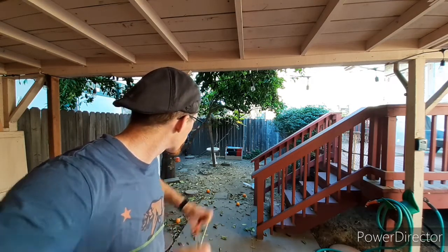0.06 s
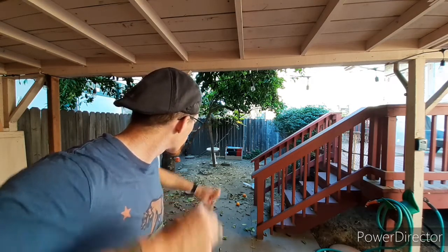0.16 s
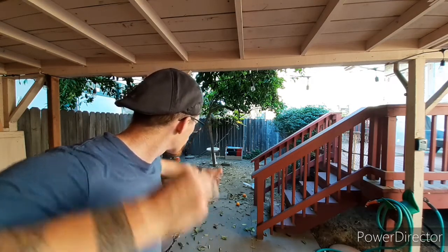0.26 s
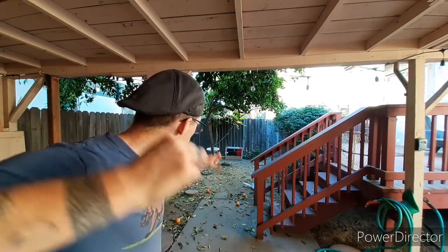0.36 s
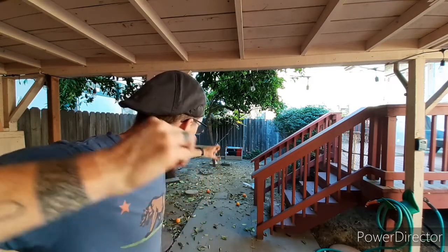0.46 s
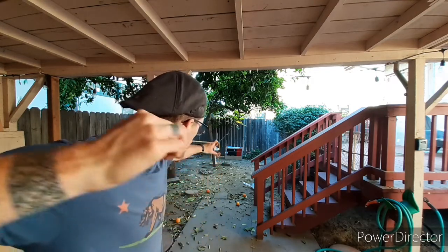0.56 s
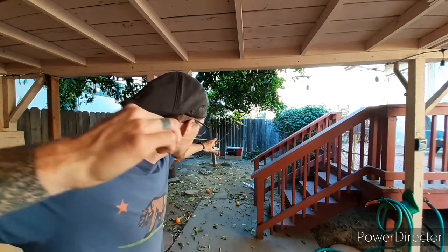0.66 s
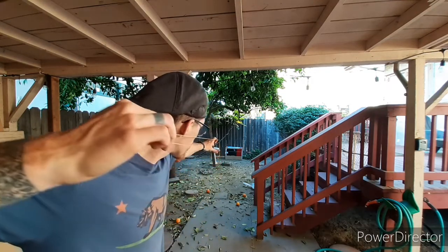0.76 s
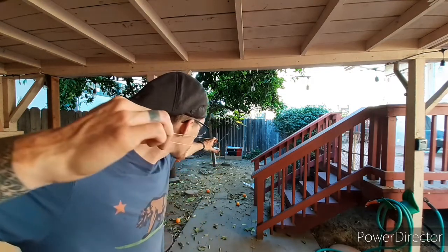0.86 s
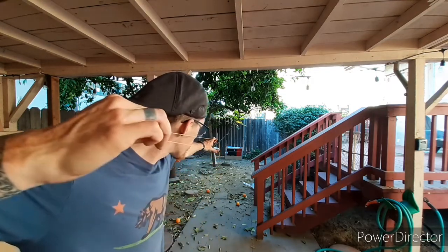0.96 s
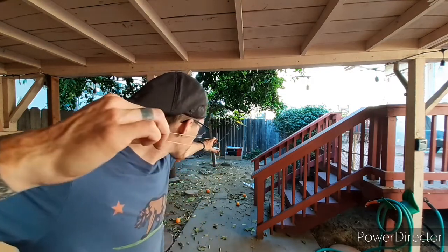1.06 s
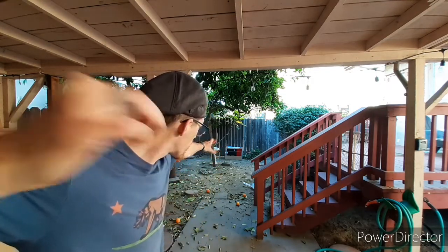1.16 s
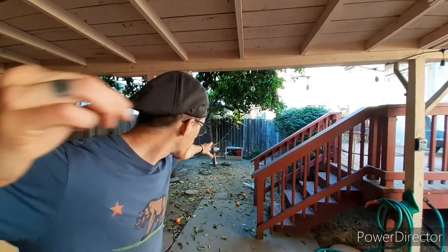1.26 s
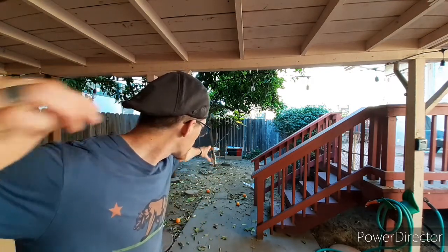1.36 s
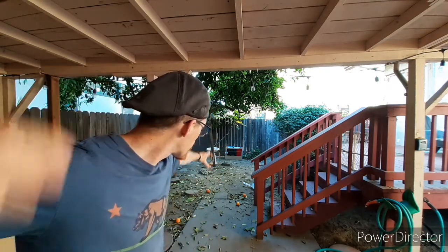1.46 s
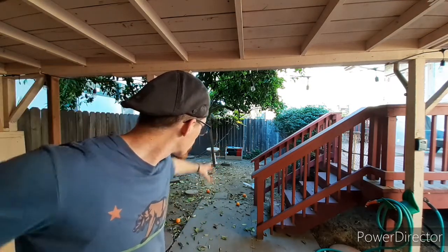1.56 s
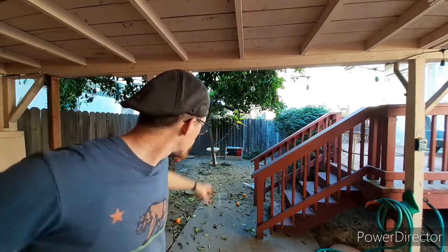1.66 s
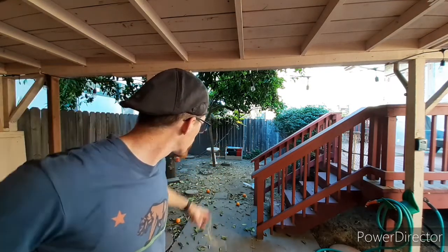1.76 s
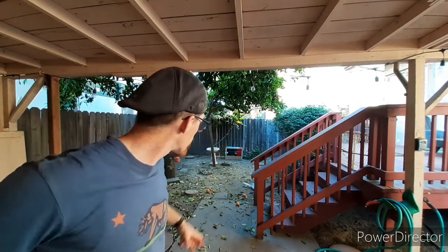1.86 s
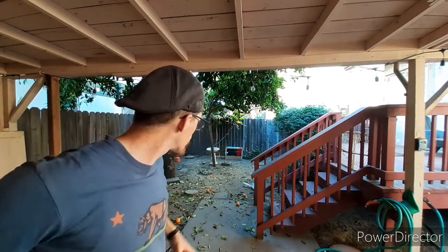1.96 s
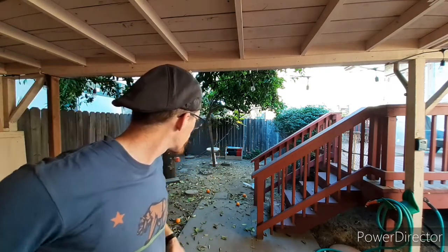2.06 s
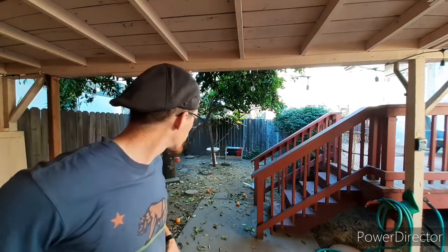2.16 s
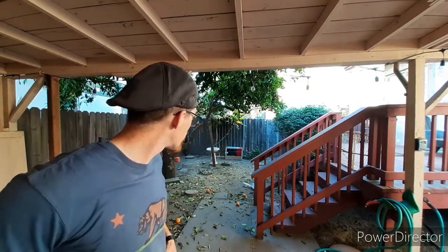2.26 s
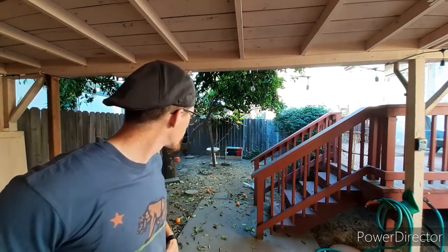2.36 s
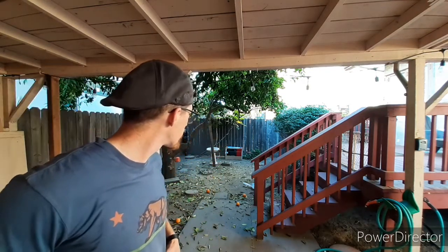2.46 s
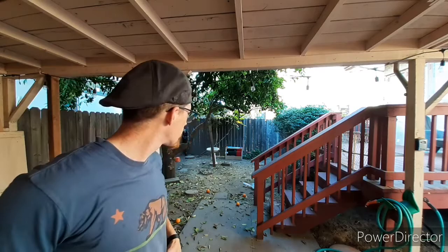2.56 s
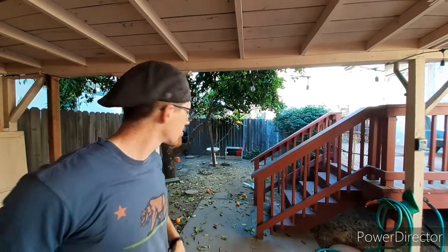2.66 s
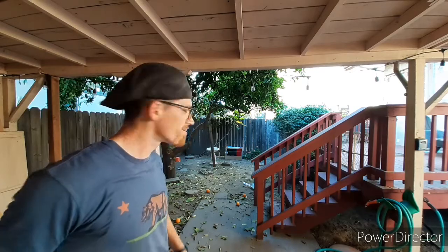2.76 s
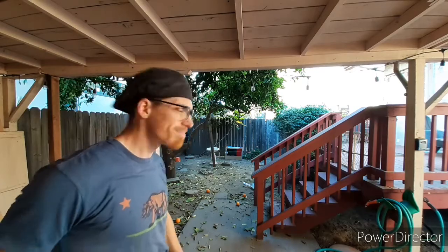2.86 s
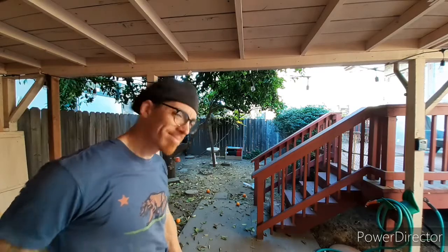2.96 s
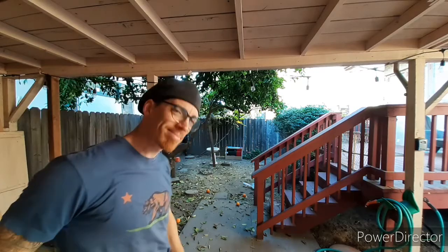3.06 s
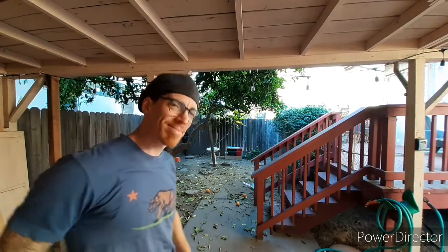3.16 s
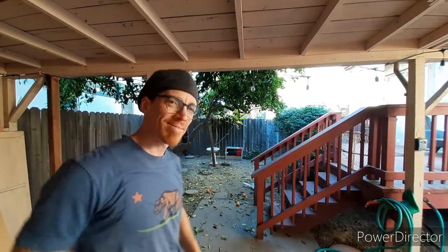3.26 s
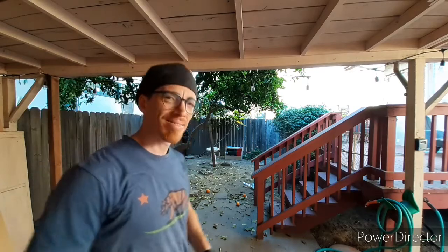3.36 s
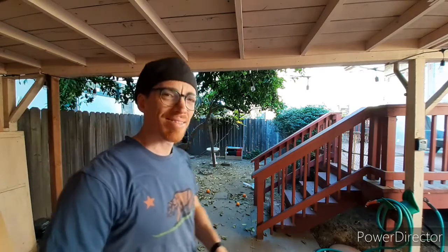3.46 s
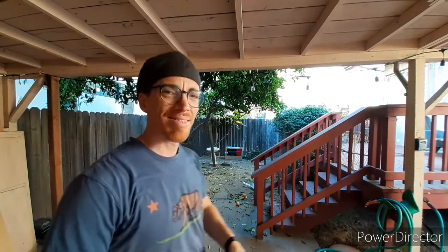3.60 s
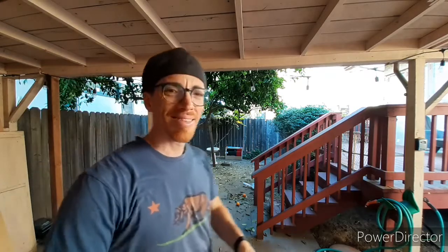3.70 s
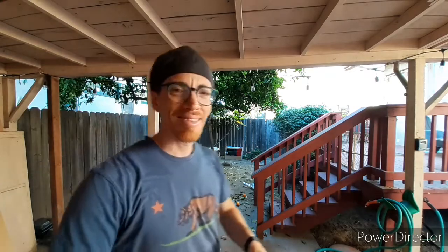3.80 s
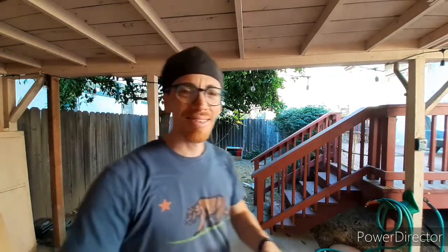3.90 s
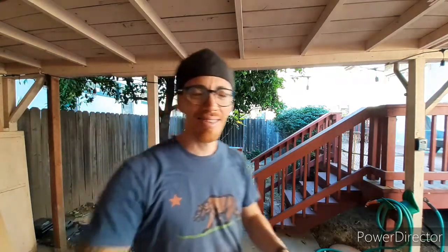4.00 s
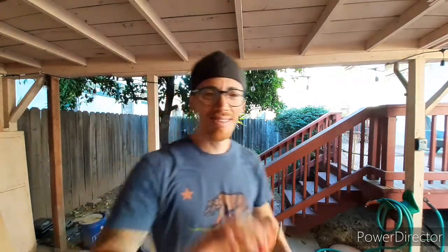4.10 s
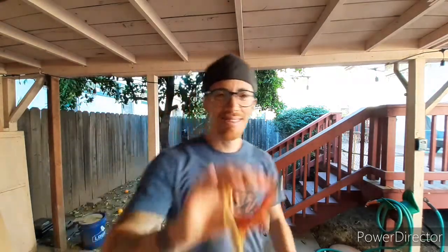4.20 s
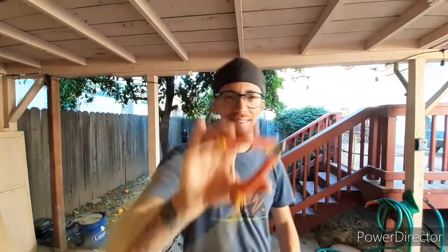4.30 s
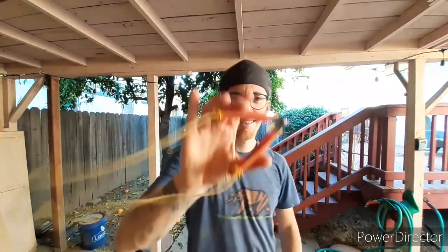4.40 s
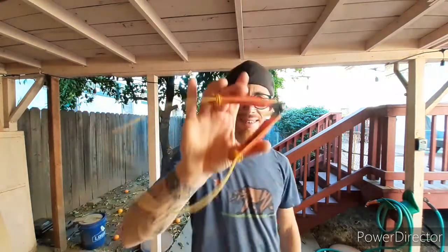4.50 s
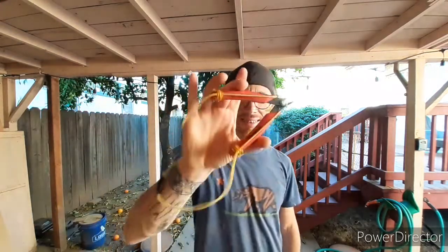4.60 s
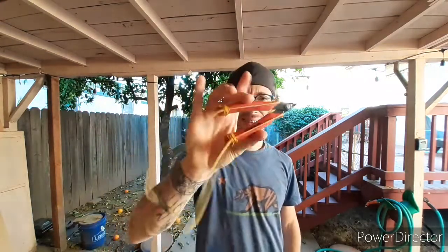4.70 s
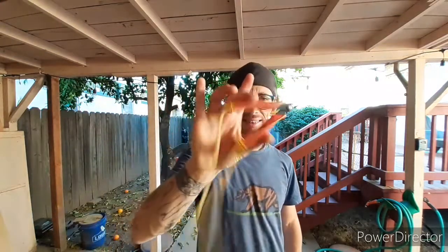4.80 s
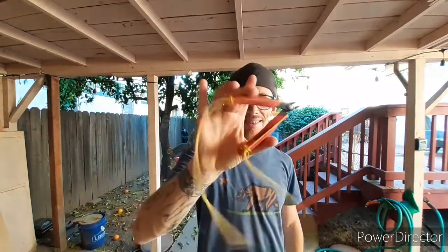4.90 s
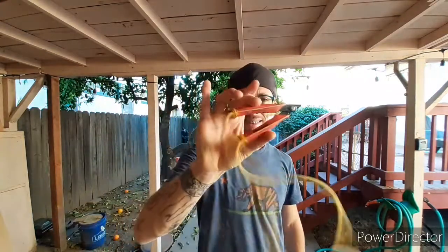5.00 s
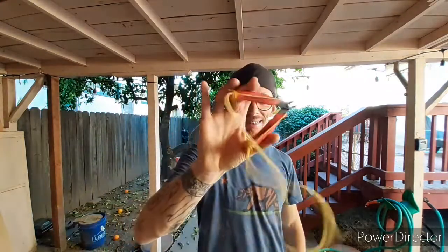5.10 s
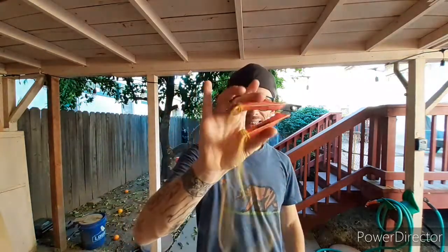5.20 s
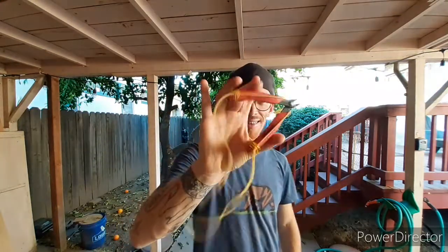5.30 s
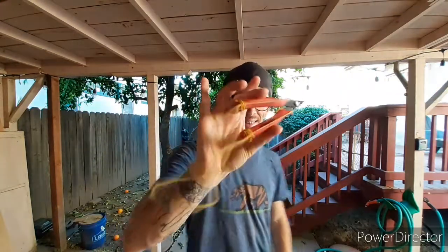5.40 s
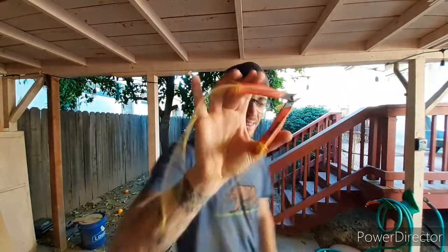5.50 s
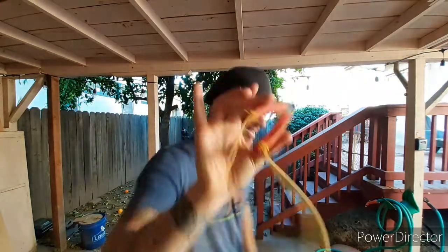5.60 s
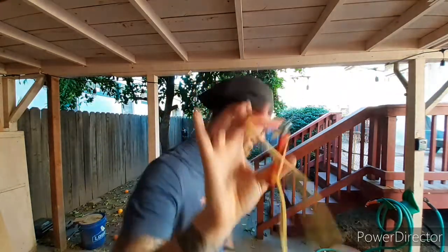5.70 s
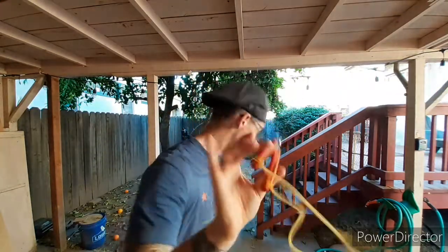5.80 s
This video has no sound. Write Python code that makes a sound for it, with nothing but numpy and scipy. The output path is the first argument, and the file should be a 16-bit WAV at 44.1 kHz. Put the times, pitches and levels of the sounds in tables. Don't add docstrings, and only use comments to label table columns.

```python
import sys
import numpy as np
from scipy import signal
from scipy.fft import rfft, irfft, next_fast_len
from scipy.io import wavfile
from scipy.ndimage import uniform_filter1d

SR = 44100
rng = np.random.default_rng(int(sys.argv[2]) if len(sys.argv) > 2 else 0)


def linear_from_db(decibels):
    return 10 ** (np.asarray(decibels, float) / 20)


def to_wav(sig):
    pcm = np.clip(np.atleast_2d(sig), -1, 1) * 32767
    pcm = np.round(pcm).astype(np.int16)
    wavfile.write(sys.argv[1], SR, pcm.T)


N = 257940


def evened(x):
    return x / np.sqrt(np.mean(x ** 2) + 1e-20)


def read(points, hz):
    f, value = np.transpose(points)
    return np.interp(np.log(hz + 1), np.log(f + 1), value)


def add(mix, s, sound):
    part = mix[..., round(s * SR):][..., :sound.shape[-1]]
    part += sound[..., :part.shape[-1]]


def colour(points, tilt_db=0.):
    hz = abs(np.fft.fftfreq(4096, 1 / SR))
    level_db = read(points, hz) + tilt_db * np.log2((hz + 50) / 3000)
    log_gain = np.log(linear_from_db(np.maximum(level_db, -100)))
    phase = -signal.hilbert(log_gain).imag
    taps = np.fft.ifft(np.exp(log_gain + 1j * phase)).real[:2048]
    return taps / np.linalg.norm(taps)


def resonate(x, hz, width_hz):
    turn = np.exp(2j * np.pi * np.cumsum(hz * np.ones(x.shape[-1])) / SR)
    r = np.exp(-np.pi * width_hz / SR)
    return 2 * (turn * signal.lfilter([1 - r], [1, -r], x / turn)).real


def wander(count, seconds):
    pole = np.exp(-1 / (seconds * SR))
    return evened(signal.lfilter([1], [1, -pole], rng.standard_normal(count)))


def drift(seconds):
    coarse = N // 64 + 2
    return np.interp(np.arange(N) / 64, np.arange(coarse), wander(coarse, seconds / 64))


def stroke(t, s, hold_s, rise_db_per_s, fall_db_per_s):
    return -rise_db_per_s * np.maximum(s - t, 0) - fall_db_per_s * np.maximum(t - s - hold_s, 0)


def hiss(field_db, likeness, size):
    frames, hz = N * 4 // size + 5, np.fft.rfftfreq(size, 1 / SR)[:, None]
    a, b, c, d = rng.standard_normal((frames, len(hz), 4)).T
    same, left = np.clip(likeness(hz), 0, 1), a + 1j * b
    right = same * left + np.sqrt(1 - same ** 2) * (c + 1j * d)
    z = np.array([left, right]) * linear_from_db(field_db(hz, np.arange(frames) * size / 4 / SR))
    return signal.istft(z, nperseg=size, noverlap=size - size // 4)[1][:, :N]


def burst(ms):
    t = np.arange(600) / SR
    a, b = rng.standard_normal((2, len(t)))
    return np.array([a, 0.45 * a + 0.42 * b]) * np.exp(-(t / (ms / 1000)) ** 2) * .5


def ring(modes, rise_s):
    t = np.arange(SR * 3 // 8) / SR
    detune = 1 + .01 * rng.standard_normal(len(modes))
    out = np.zeros(len(t))
    for (hz, db, t60_s), d in zip(modes, detune):
        out += linear_from_db(db - 60 * t / t60_s) * np.sin(2 * np.pi * hz * d * t)
    return out * (1 - np.exp(-t / rise_s))


# (frequency [Hz], t60 [s])
YARD_T60 = [(120, 0.63), (330, 0.56), (870, 0.49), (2300, 0.49), (6060, 0.43), (13000, 0.39)]
# (frequency [Hz], likeness [clipped to 0..1])
LIKENESS = [(60, 0.9), (250, 0.65), (550, 0.24), (1650, -2.4), (4970, -2.5), (15000, 0.4)]


def echoes(gap_s, rise_s, stretch):
    hz, t, z = signal.stft(rng.standard_normal((2, SR * 3 // 8)), SR, nperseg=256)
    same = np.clip(read(LIKENESS, hz), 0, 1)[:, None]
    z = np.array([z[0], same * z[0] + np.sqrt(1 - same ** 2) * z[1]])
    patches = uniform_filter1d(rng.standard_normal(z.shape[1:]), 3, axis=0)
    z = z * linear_from_db(1.3 * evened(uniform_filter1d(patches, 8, axis=1)))
    decay_db = -60 * t / (stretch * read(YARD_T60, hz)[:, None])
    tail = signal.istft(z * linear_from_db(decay_db), SR, nperseg=256)[1]
    count = tail.shape[1]
    onset = np.clip((np.arange(count) / SR - gap_s) / rise_s, 0, 1)
    tail = tail * onset * linear_from_db(0.87 * wander(count, 0.00083))
    return tail / np.linalg.norm(tail[0])


# (frequency [Hz], level [dB], t60 [s])
BOX_MODES = [(184.6, -4, 0.63), (293, -9, 0.15), (580.6, -9, 0.2), (783, -10, 0.24), (1029, 4, 0.12),
             (1120, -7.5, 0.38), (1580, 1.1, 0.15), (2030, -8, 0.22), (3360, -9, 0.23), (3580, -10, 0.44),
             (3950, -13.5, 0.28)]
# (frequency [Hz], level [dB], t60 [s])
GROUND_MODES = [(160, -12, 0.32), (175, -4, 0.14), (209.5, -2.5, 0.12), (332, -6, 0.025),
                (460, -7.5, 0.072)]


def shot(rows, spectrum, direct_db, contact_ms, gap_s, rise_s, stretch, ring_db, ring_per_thud, edge_db):
    out = np.zeros((2, N))
    for s, peak_db, tilt_db, thud_db, echo_db in rows:
        pulse = colour(spectrum, tilt_db)[None]
        edge = colour(spectrum, tilt_db + edge_db)[None]
        crack = signal.fftconvolve(burst(contact_ms), edge)
        add(out, s, linear_from_db(peak_db + direct_db) * crack)
        yard = signal.fftconvolve(echoes(gap_s, rise_s, stretch), pulse)
        add(out, s, linear_from_db(peak_db + echo_db + 8.5) * yard)
        box = linear_from_db(peak_db + ring_db + ring_per_thud * thud_db) * ring(BOX_MODES, 0.0053)
        add(out, s, box + linear_from_db(peak_db + thud_db) * ring(GROUND_MODES, .012))
    return out


# (time [s], peak [dB], tilt [dB/octave], thud [dB], yard echo [dB])
STRIKE_HITS = [
    (1.3521, 0.6, -0.2, -30.5, 8.5),
    (1.3534, -4, 1, -45, -7.5),
    (1.3546, -8, 0.5, -45.5, -9),
    (1.359, -10, 2.7, -44.5, -5.5),
    (1.387, -14, 0.2, -45.5, 14.5),
]
# (frequency [Hz], density [dB per Hz])
CRACK_SPECTRUM = [(59, -68.5), (100, -48.5), (177, -7.5), (229, -14.5), (365, -19), (481, -23),
                  (736, -19.5), (1130, -10.5), (1800, -9), (2000, -7), (2690, -14), (3600, -5),
                  (4200, -6.5), (4900, -13.5), (12400, -13.5), (16000, -25.5)]


def strike():
    return shot(STRIKE_HITS, CRACK_SPECTRUM, direct_db=0.28, contact_ms=2.0, gap_s=.0015, rise_s=0.0087,
                stretch=0.88, ring_db=13.5, ring_per_thud=1.31, edge_db=1.0)


# (time [s], peak [dB], tilt [dB/octave], thud [dB], yard echo [dB])
BOUNCE_HITS = [(1.6855, -28.5, -0.05, -1.5, 13.9), (1.771, -17, 0, -31, 10.25), (1.788, -45, 0, -20, 3.34),
               (2.033, -46.5, 0.2, 15, 17.8), (2.045, -39, 1, 4, 14), (2.094, -27, 0.3, -8, 15),
               (2.116, -16.5, -0.54, -14, 11), (2.124, -22, 1.5, -20.5, 10), (2.146, -22.5, -3.5, -7, 10),
               (2.185, -33, -7.5, 8.5, 8), (2.458, -42.5, -2.5, -10, 11), (2.489, -40, -4.5, -8, 9.1)]
# (frequency [Hz], density [dB per Hz])
KNOCK_SPECTRUM = [(59, -36), (100, -42), (177, -7.5), (662, -4.5), (784, 0), (872, -4.5), (1580, -4.5),
                  (2300, -8), (3600, -7), (4500, -13.5), (9820, -14), (14700, -20), (16000, -37)]


def bounces():
    return shot(BOUNCE_HITS, KNOCK_SPECTRUM, direct_db=-4.5, contact_ms=1.6, gap_s=.0003, rise_s=0.003,
                stretch=0.85, ring_db=-16, ring_per_thud=0.21, edge_db=2.5)


# (time [s], peak [dB], tilt [dB/octave])
BAND_SLAPS = [
    (1.2175, -21, 3.5),
    (1.2268, -17, -6.5),
    (1.2379, -4.5, 3.4),
    (1.2403, -11.5, 5),
    (1.2444, -15.5, -0.6),
    (1.267, -13.5, 0),
    (1.269, -13, 1.4),
    (1.2728, -11.5, 2.6),
    (1.2922, -14.5, 1.9),
    (1.297, -18.5, 3.5),
]
# (frequency [Hz], density [dB per Hz])
RUBBER_SPECTRUM = [(59, -44.5), (130, -21.5), (200, -6), (322, -1.5), (513, -5.5), (1200, -5), (1800, -5.5),
                   (3940, -5), (5200, -11.5), (7450, -12.5), (8280, -5), (13200, -5), (16000, -12)]
LEAD_S, LEAD_DB, LEAD_RISE_DB_PER_S = 1.214, -48.5, 701
FLAP_S, FLAP_HOLD_S, FLAP_DB, FLAP_RISE_DB_PER_S, FLAP_FALL_DB_PER_S = 1.239, 0.046, -22, 2997.5, 340


def bands():
    t = 1.2 + np.arange(6400) / SR
    lead_db = LEAD_DB + LEAD_RISE_DB_PER_S * (t - LEAD_S) + stroke(t, LEAD_S, 0, 5000, 0)
    lead = linear_from_db(lead_db) * (t < FLAP_S)
    flap = linear_from_db(FLAP_DB + stroke(t, FLAP_S, FLAP_HOLD_S, FLAP_RISE_DB_PER_S, FLAP_FALL_DB_PER_S))
    flutter = linear_from_db(2.5 * wander(len(t), .0005))
    grains = flutter * (rng.standard_normal(len(t)) + 0.47 * rng.standard_normal((2, len(t))))
    out = np.zeros((2, N))
    add(out, t[0], np.hypot(lead, flap) * linear_from_db(-2.0) * evened(grains))
    out = signal.fftconvolve(out, colour(RUBBER_SPECTRUM)[None])[:, :N]
    for s, peak_db, tilt_db in BAND_SLAPS:
        slap = signal.fftconvolve(burst(0.86), colour(RUBBER_SPECTRUM, tilt_db)[None])
        add(out, s, linear_from_db(peak_db - 1.5) * slap)
    return out + linear_from_db(-6) * signal.fftconvolve(out, echoes(0.0031, 0.0052, 0.78), axes=1)[:, :N]


# (time at full rub [s], hold [s], level [dB], tilt [dB/octave], sole resonance [dB])
SCUFF_STROKES = [(2.294, .01, -57.5, 3.5, -1.1), (2.386, 0.063, -68.5, 9, 0), (2.46, 0.053, -70.5, -6, 0),
                 (2.836, 0.042, -74.5, 6, -13), (2.927, 0.178, -60.5, 0.5, -10.5),
                 (3.171, 0.059, -45, 2, -14.5), (3.279, .045, -48.5, -3, -16), (3.42, .08, -68.5, 3.5, -2),
                 (3.549, .18, -70, 3, -7.5), (3.9, .1, -82, 5, -12), (4.032, .02, -55, -.5, 2.5),
                 (4.058, 0.021, -49.5, 0, 2.5), (4.302, 0.092, -54.5, -2.1, -17),
                 (4.521, 0.0066, -49.5, -1.3, -19), (4.64, 0.11, -80, 5, -12), (5.05, .15, -80, -1.5, -5),
                 (5.322, 0.097, -64, -3, -9), (5.473, 0.063, -59.5, 0.5, -22), (5.58, 0.3, -65, -1.5, -15),
                 (5.636, 0.00482, -56, -1, -16), (5.846, .01, -63.5, -1.5, -13)]
# (frequency [Hz], density [dB per Hz])
CLOTH_SPECTRUM = [(410, -42), (700, -1.5), (946, -15.5), (1200, -5.5), (1350, -8), (1770, -5), (3640, -8),
                  (6920, -13), (8530, -8.5), (15000, -15), (16000, -30.5)]
# (frequency [Hz], width [Hz], level [dB])
SOLE_MODES = [(1790, 150, 13.5), (3050, 1600, 15.5), (3250, 190, 5.5)]
RUB_RISE_DB_PER_S, RUB_FALL_DB_PER_S = 230, 195
SOLE_BITE = 1.03


def scuffs():
    s, hold_s, level_db, tilt_db, sole_db = np.transpose(SCUFF_STROKES)[..., None]
    clock = np.arange(0, N / SR + .002, .002)
    rise = RUB_RISE_DB_PER_S * linear_from_db(SOLE_BITE * (sole_db + 16.5))
    power = linear_from_db(level_db + stroke(clock, s, hold_s, rise, RUB_FALL_DB_PER_S)) ** 2 + 1e-14
    total = power.sum(0)
    tilt = (power * tilt_db).sum(0) / total
    drag_db = (power * sole_db).sum(0) / total

    def rub_db(hz, t):
        return read(CLOTH_SPECTRUM, hz) + np.interp(t, clock, tilt) * np.log2((hz + 50) / 6000)

    rub = hiss(rub_db, lambda hz: 0.15 + 0 * hz, size=256)
    sole = evened(sum(linear_from_db(db) * resonate(rub, hz, width_hz) for hz, width_hz, db in SOLE_MODES))
    t = np.arange(N) / SR
    grain = linear_from_db(0.55 * wander(N, 0.0015))
    drag = linear_from_db(np.interp(t, clock, drag_db))
    return np.interp(t, clock, np.sqrt(total)) * grain * (evened(rub) + drag * sole)


# (time [s], peak [dB])
TICK_TIMES = [(2.395, -51), (2.4399, -57), (2.831, -52.5), (2.8494, -58), (3.3094, -46), (3.4501, -52),
              (4.842, -62), (5.0394, -59), (5.1144, -60), (5.2543, -56), (5.3085, -50.5), (5.4586, -48),
              (5.6504, -39), (5.8152, -40.5), (5.8394, -39)]
# (frequency [Hz], density [dB per Hz])
TICK_SPECTRUM = [(1760, -55), (3000, -13), (5710, -51), (7400, -13), (8700, 1), (12900, -12), (16000, -22)]


def ticks():
    out = np.zeros((2, N))
    for s, peak_db in TICK_TIMES:
        add(out, s, linear_from_db(peak_db) * burst(1.0))
    out = signal.fftconvolve(out, colour(TICK_SPECTRUM)[None])[:, :N]
    return out + linear_from_db(1.5) * signal.fftconvolve(out, echoes(.002, .003, .3), axes=1)[:, :N]


# (time at full weight [s], level [dB], board mode [Hz], groan above it [dB])
WEIGHT_SHIFTS = [
    (3.09, -41.5, 125.5, 1.5),
    (5.766, -43.5, 77.75, -2.5),
    (5.85, -48.5, 82, -4.5),
]
LEAN_IN_DB_PER_S, LEAN_OUT_DB_PER_S = 234, 195


def thumps():
    out = np.zeros(N)
    t = np.arange(SR // 4) / SR
    for s, level_db, hz, groan_db in WEIGHT_SHIFTS:
        push, drag = rng.standard_normal((2, len(t)))
        boom = resonate(resonate(push, hz, 16), hz, 29)
        groan = resonate(resonate(drag, 286, 230), 170, 300)
        weight = linear_from_db(level_db + stroke(t, 1 / 8, 0, LEAN_IN_DB_PER_S, LEAN_OUT_DB_PER_S))
        add(out, s - 1 / 8, weight * (evened(boom) + linear_from_db(groan_db) * evened(groan)))
    return out


# (time [s], traffic [dB], motor load as its lowest hum line [dB])
TOWN_LEVELS = [(0.0, -54, -44.5), (0.41, -53, -43), (0.94, -55, -51), (1.3, -53.5, -51.5),
               (1.6, -56.5, -56), (2.3, -57, -67), (2.75, -58, -63), (3.1, -52.5, -59), (3.5, -55, -58),
               (4.4, -56, -50), (4.8, -56, -58), (5.39, -56.5, -49), (5.85, -53, -61)]
# (frequency [Hz], density [dB per Hz])
TRAFFIC_SPECTRUM = [(15, -60), (25, -39.5), (58, -2.5), (78, -1.5), (118, -11), (200, -8), (320, -12.5),
                    (500, -16.5), (1030, -18.5), (2000, -29), (3500, -42), (4550, -58.5), (7700, -100)]
# (frequency [Hz], level [dB])
HUM_LINES = [(177, -63), (235.2, -50), (294, -59), (353, -68.5), (470, -65), (528, -67.5), (764, -67),
             (2600, -79)]
HUM_LOW_HZ = 116
BASS_DB, BASS_DB_PER_LOAD_DB = 12.5, 0.25


def town():
    s, level_db, hum_db = np.transpose(TOWN_LEVELS)
    bass_db = BASS_DB + BASS_DB_PER_LOAD_DB * hum_db

    def wash_db(hz, t):
        return read(TRAFFIC_SPECTRUM, hz) + np.interp(t, s, bass_db) / (1 + (hz / 150) ** 2)

    wash = hiss(wash_db, lambda hz: read(LIKENESS, hz), size=2048)
    t = np.arange(N) / SR
    out = linear_from_db(np.interp(t, s, level_db) + 6.0) * evened(wash)
    for hz, db in HUM_LINES + [(HUM_LOW_HZ, np.interp(t, s, hum_db))]:
        turns = np.cumsum(hz * (1 + .001 * drift(.3))) / SR
        level = linear_from_db(db - 1.0 + 0.65 * drift(0.26))
        out = out + level * np.sin(2 * np.pi * (turns + rng.random()))
    return out


# (frequency [Hz], density [dB per Hz])
PREAMP_SPECTRUM = [(2060, -30), (3500, -4.5), (4260, -10.5), (5000, -8), (7600, -14), (8310, -5.5),
                   (9500, -11.5), (14900, -7.5), (15700, -11.5), (16000, -16.5)]


def preamp():
    return linear_from_db(-77) * evened(hiss(lambda hz, t: read(PREAMP_SPECTRUM, hz) + 0 * t, lambda hz: 0 * hz, size=256))


def scene():
    return strike() + bounces() + bands() + scuffs() + ticks() + thumps() + town() + preamp()


def band_limit(x):
    return signal.sosfilt(signal.butter(12, 16640, fs=SR, output="sos"), x)


# (frequency [Hz], gain [dB])
MIC_RESPONSE = [(20, -19), (45, -3.5), (70, -0.5), (15400, -0.5), (15650, -9), (15850, -29), (16600, -35.5),
                (17000, -70.5)]
# (frequency [Hz], left minus right [dB])
PORT_BALANCE = [(60, 2.5), (240, 0.5), (950, 2.5), (3770, 1), (15000, 2)]


def record(dry):
    size = next_fast_len(N)
    hz = np.fft.rfftfreq(size, 1 / SR)
    left, right = rfft(1.3 * np.tanh(dry / 1.298), size)
    mid = (left + right) / 2
    side = (left - right) / 2 * hz / np.sqrt(hz ** 2 + 160 ** 2)
    gain_db = read(MIC_RESPONSE, hz) + read(PORT_BALANCE, hz) * np.array([[.5], [-.5]])
    ports = (mid + np.array([side, -side])) * linear_from_db(gain_db)
    return band_limit(irfft(ports, size)[:, :N])


dry = scene()
out = record(dry)
to_wav(out)
```